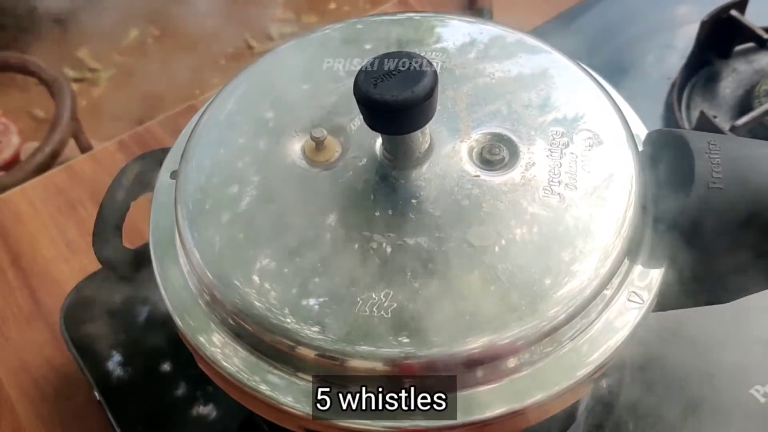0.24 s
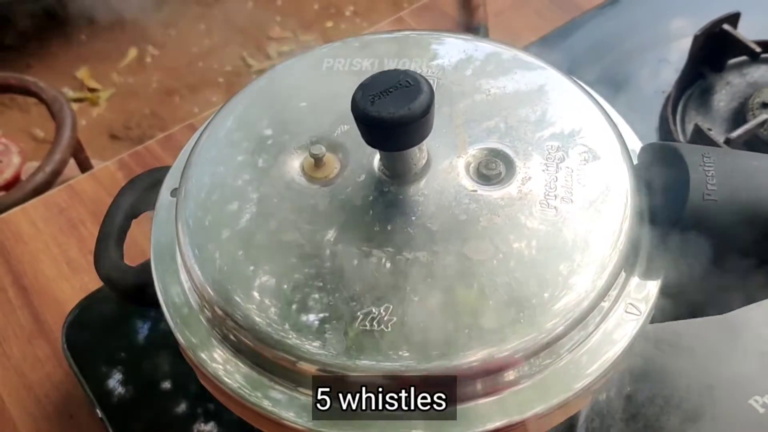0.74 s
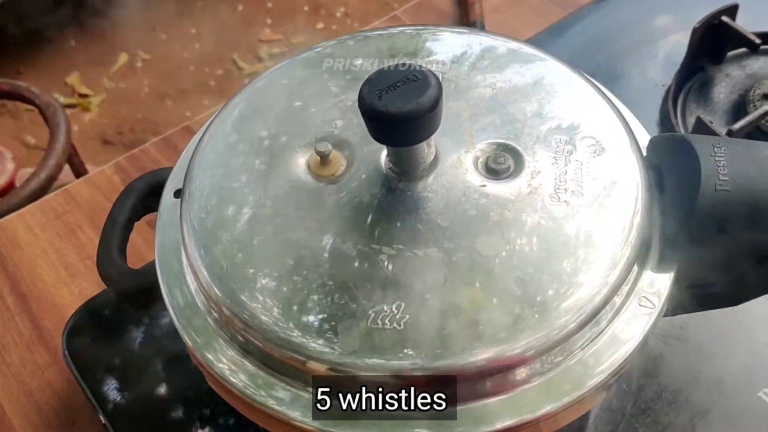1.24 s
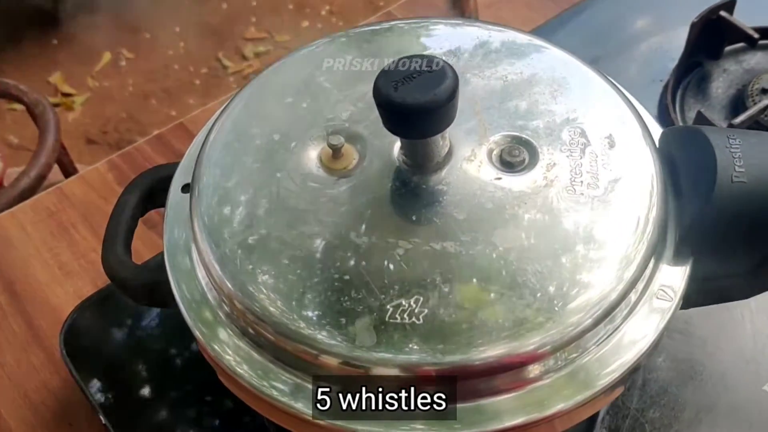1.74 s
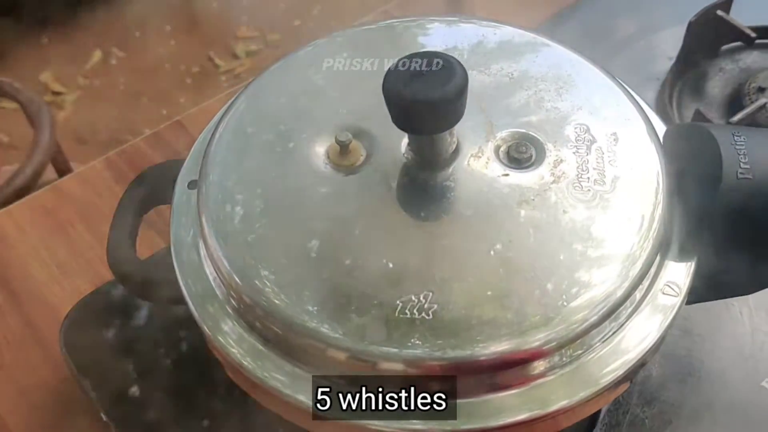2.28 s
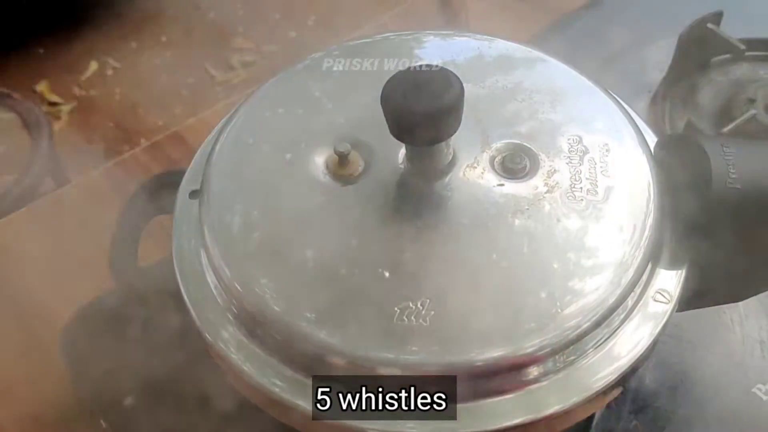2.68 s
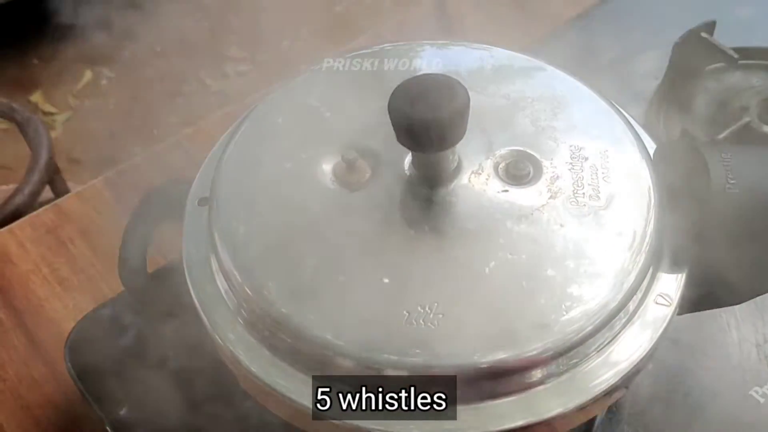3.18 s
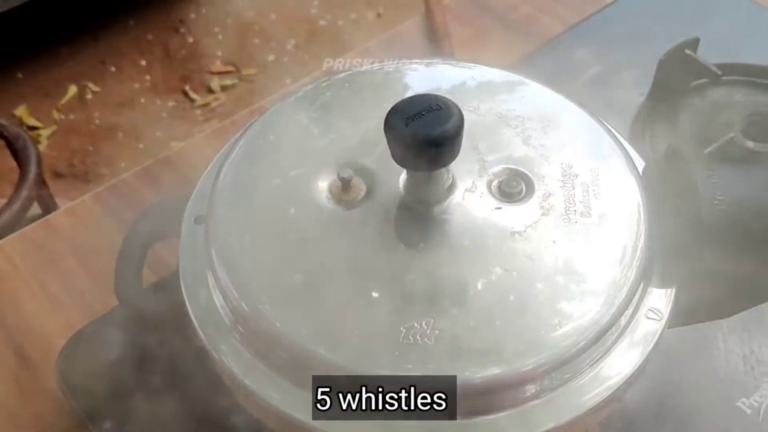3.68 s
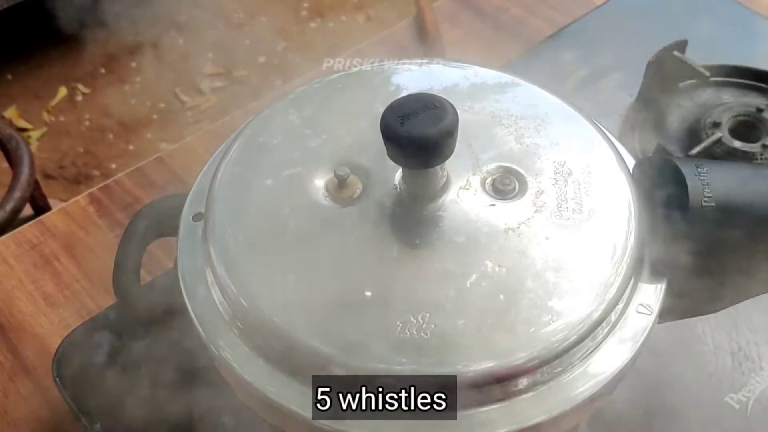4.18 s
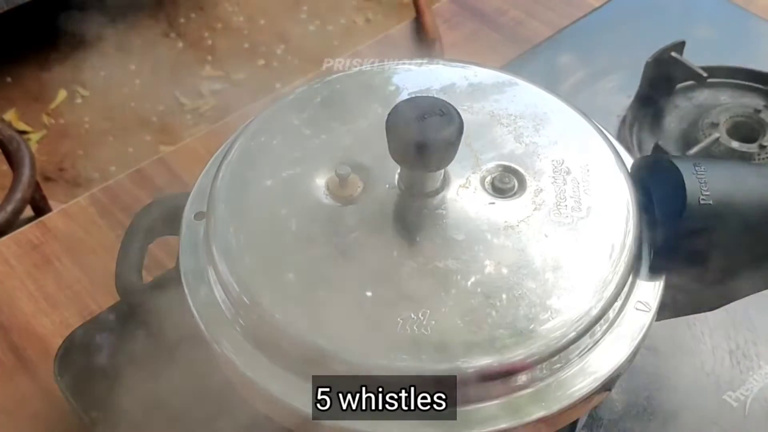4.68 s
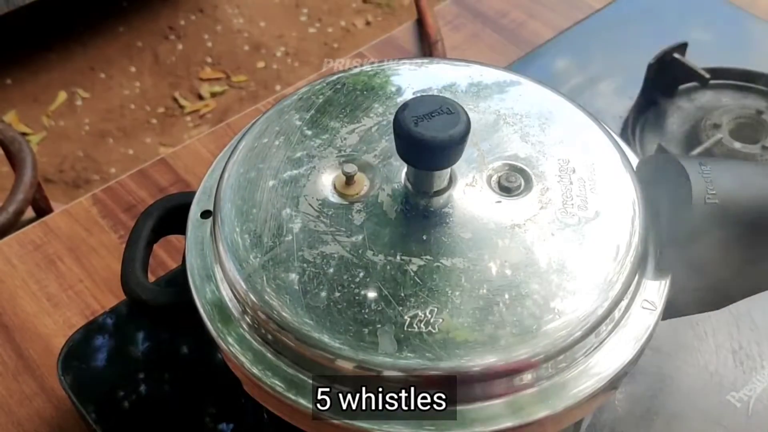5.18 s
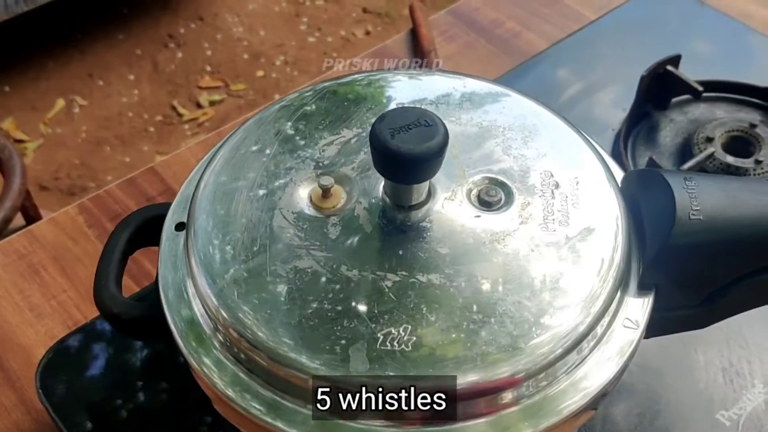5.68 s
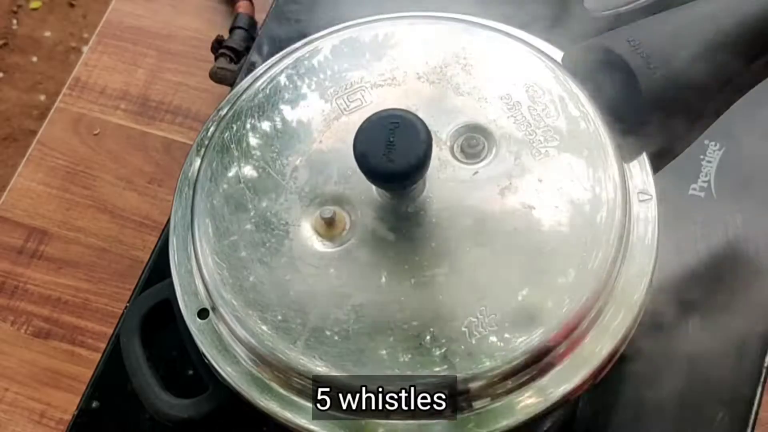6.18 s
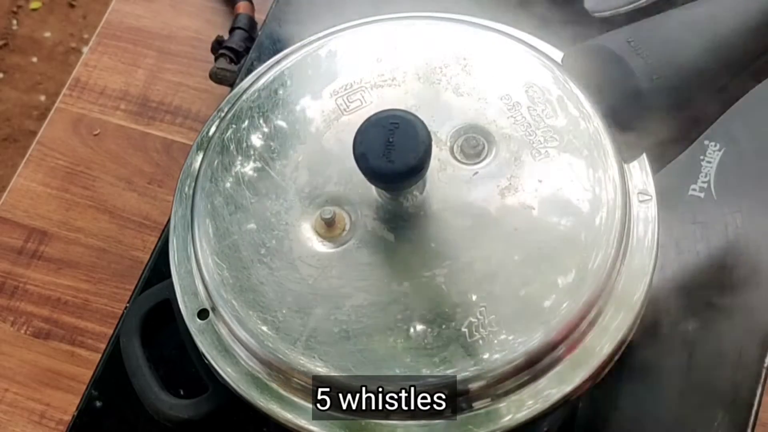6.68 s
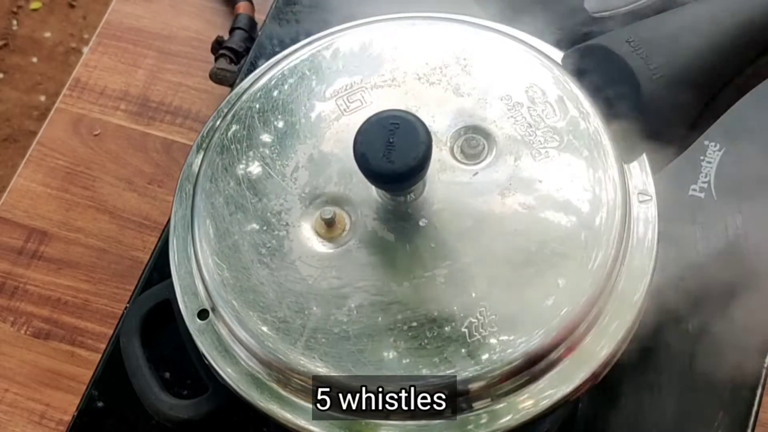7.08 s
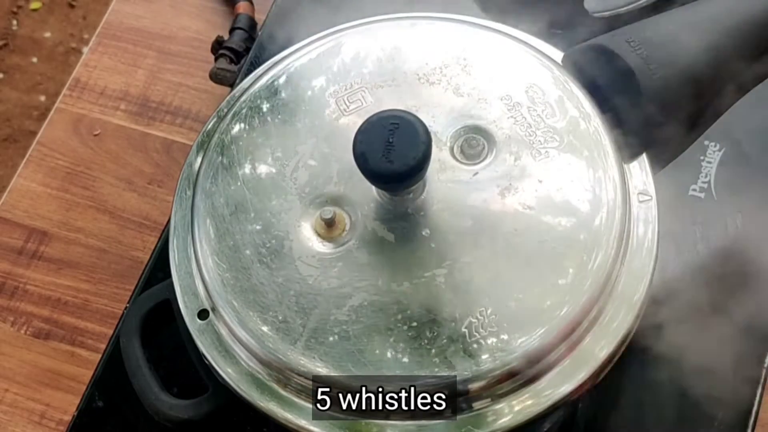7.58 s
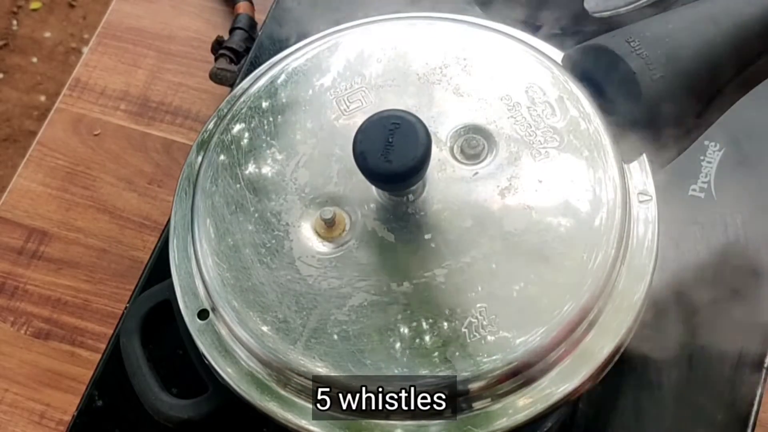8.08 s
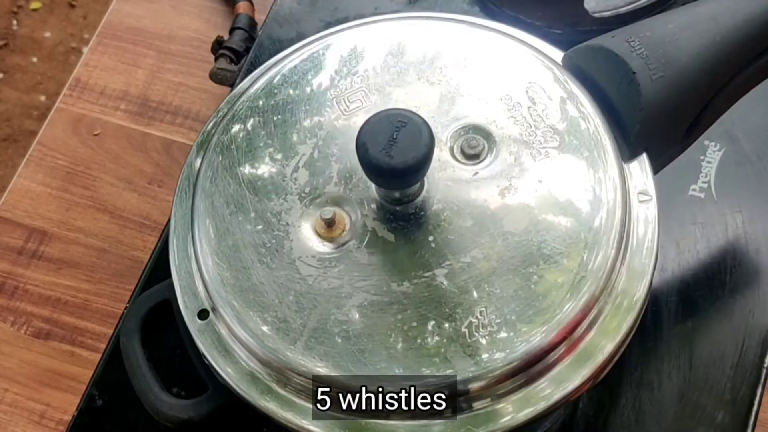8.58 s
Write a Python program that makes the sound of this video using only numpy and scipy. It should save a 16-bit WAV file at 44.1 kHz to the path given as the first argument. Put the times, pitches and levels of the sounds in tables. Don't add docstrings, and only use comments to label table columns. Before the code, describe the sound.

Close stereo microphone in a yard: a long, loud, bright steam blast, distorted with rough crackling spurts, stops suddenly. Quick bird whistles, short steam spits, a gurgle and two light metal taps follow over faint traffic air. The scene fades out and into a second steady steam hiss, slightly softer and cleaner, with wind rumble and an idling engine. It snaps shut, leaving a faint seep and a distant honk.

```python
import sys
import numpy as np
from scipy import signal
from scipy.io import wavfile
from scipy.ndimage import uniform_filter1d

SR = 44100
rng = np.random.default_rng(int(sys.argv[2]) if len(sys.argv) > 2 else 0)


def makeup_ratio(level_db):
    decades = np.asarray(level_db, float) / 20
    return 10 ** decades


def log_audio(samples):
    frames = np.atleast_2d(samples).T
    limited = np.clip(frames, -1, 1)
    pcm = np.round(limited * 32767).astype(np.int16)
    wavfile.write(sys.argv[1], SR, pcm)


N = 389844

# (frequency [Hz], level [dB per Hz])
YARD_COLOUR = [(12, -31), (20, 4), (170, -1.5), (319, -14.5), (1390, -17), (2620, -17), (2930, -20.5),
               (3460, -20), (4200, -22), (4950, -14), (6500, -19), (9370, -25), (12000, -25.5),
               (15000, -34)]
YARD_DB = -42
# (frequency [Hz], likeness [0-1])
YARD_SAME = [(30, 0.87), (500, 0.9), (1000, 0), (4000, 0.06)]
# (frequency [Hz], lead [radians])
LEAK_LEAD = [(700, 0.73), (2330, 6.2), (4570, 12), (9900, 20.7)]
# (frequency [Hz], level [dB])
HUM = (180, -57.5)

# (time [s], length [s], pitch [Hz], level [dB])
HELD_NOTES = [(4.799, .088, 2770, -45), (4.9, .025, 2370, -41), (4.926, .012, 2350, -30),
              (5.016, 0.029, 3630, -33), (5.06, .012, 2350, -40), (5.141, 0.038, 3580, -35),
              (5.235, 0.066, 1850, -40), (5.251, 0.024, 3680, -42), (5.295, 0.04, 1776, -35.5),
              (5.297, .025, 3520, -42.5), (5.344, 0.03, 3050, -41), (5.413, .035, 1750, -39),
              (5.414, .039, 5150, -43), (5.418, .02, 2420, -40), (5.418, .064, 3520, -45),
              (5.45, 0.028, 1840, -40), (5.465, 0.054, 2670, -44), (5.48, 0.027, 2240, -32.5),
              (5.48, 0.038, 3450, -39), (5.519, 0.025, 2610, -29.5), (5.562, 0.044, 3790, -35),
              (5.565, 0.038, 1867, -35), (5.695, 0.034, 2390, -32.5), (5.755, .022, 1900, -44),
              (5.795, 0.022, 2620, -40), (5.823, 0.0094, 2330, -31), (6.012, .022, 2580, -36),
              (6.122, .02, 2550, -41), (5.41, 0.057, 1800, -44), (5.72, 0.052, 1900, -48),
              (6.056, 0.02, 2280, -37)]
# (time [s], length [s], first pitch [Hz], last pitch [Hz], level [dB])
RISING_NOTES = [(4.933, 0.027, 2400, 2880, -28.5), (5.267, .022, 2350, 3800, -38),
                (5.331, 0.017, 1850, 2650, -34.5), (5.368, .009, 3180, 3870, -38),
                (5.632, 0.02, 2890, 4050, -41), (5.768, 0.023, 2250, 2640, -39),
                (5.938, 0.031, 1900, 3300, -40.5), (6.11, 0.036, 1940, 2550, -39)]
FALLING_NOTES = [(4.96, 0.031, 2900, 2700, -35), (4.99, .024, 2680, 2560, -28.5),
                 (5.01, .021, 2470, 2140, -29.5), (5.05, 0.011, 3150, 2400, -36),
                 (5.083, .02, 4253, 3620, -29), (5.1, .015, 3740, 3100, -39), (5.1, .017, 3000, 1520, -37),
                 (5.324, 0.027, 4200, 3150, -34.5), (5.378, 0.014, 3800, 3260, -32),
                 (5.54, 0.027, 2260, 1915, -31.5), (5.55, 0.014, 4250, 3800, -33),
                 (5.604, .015, 3798, 3120, -40), (5.659, .027, 3970, 3400, -36.5),
                 (5.686, 0.016, 3310, 2420, -35.5), (5.834, .033, 2200, 1410, -49),
                 (5.999, 0.018, 3300, 2570, -38), (6.04, .02, 3380, 2880, -41),
                 (6.092, 0.018, 2310, 1850, -44)]
ARCH, RISE_HALF, FALL_HALF = 1.012, 0.552, 0.61

# (time [s], level [dB], pitch [Hz])
HORN = [
    (8.49, -52, 349.8),
    (8.515, -36.5, 348),
    (8.558, -30.5, 347),
    (8.582, -34, 343.5),
    (8.766, -28, 342),
    (8.822, -45, 360),
    (8.84, -55, 346),
]
# (multiple of pitch, level [dB])
HORN_BELL = [(6, -17.5), (7, -11), (8, -1.5), (9, -3), (10, 0), (11, -13), (12, -21)]

# (time [s], level [dB])
WIND_LEVEL = [(6.42, -37), (6.8, -37.5), (7.19, -38), (7.4, -38.5), (7.45, -42), (8.3, -42.5), (8.42, -46),
              (8.5, -27.5), (8.84, -30)]
# (frequency [Hz], level [dB per Hz])
RUMBLE = [(8.8, -38), (15, -4), (48, 0.5), (180, -12), (297, -20.5), (347, -19.5), (454, -26.5),
          (551, -24.5), (595, -27.5), (1500, -32), (1950, -38), (3300, -120)]
# (frequency [Hz], likeness [0-1])
RUMBLE_SAME = [(40, 0.1), (150, 0.72), (500, 0.4)]
DEEP_DB, DEEP_FADE_DB_PER_S, DEEP_SWAY_DB = 4.5, 4, 1
# (frequency [Hz], level [dB])
ENGINE_IDLE = [(39, -39.5), (80, -50), (134, -49)]

# (time [s], peak level [dB], pitch factor)
KNOCKS = [
    (5.9345, -13.5, 1.0),
    (6.0805, -8.5, .69),
]
# (frequency [Hz], level [dB], t60 [s])
WEIGHT_MODES = [(2350, -12, .03), (3400, -2, .022), (4340, -11, .04), (4720, -9, .06), (7000, -18, .02)]
# (time [s], level [dB], frequency [Hz], t60 [s])
SHUDDERS = [
    (4.79, -41, 646, 0.27),
    (4.865, -38, 600, .25),
    (5.984, -45, 460, 0.19),
]

# (time [s], level [dB], fall [dB per s], gurgle against the puff [dB])
LEAK_1 = [
    (4.79, -35, 170, -3),
    (4.995, -34.5, 73, 1.5),
    (5.151, -34, 260, -1),
    (5.415, -48, 600, 3),
    (5.468, -32.5, 200, -0.5),
    (5.505, -31, 202, -4),
    (5.937, -43, 150, 1),
    (5.978, -42, 90, 4),
    (6.082, -37, 40, 3.5),
]
LEAK_2 = [
    (8.41, -41, 59, -8),
    (8.52, -46.5, 12, 4),
]
# (frequency [Hz], level [dB per Hz])
LEAK_LEFT = [(3000, -33), (4000, -16.5), (5000, -7), (7000, -12), (9500, -25), (15000, -31)]
LEAK_RIGHT = [(3000, -27), (4400, -9), (5500, -3), (6000, 5.5), (6600, -2), (7500, -6.5), (9500, -16.5),
              (15000, -27)]
LEAK_LATE = [(3000, -4), (4400, -18), (6000, -9), (9500, -12), (15000, -20)]
# (frequency [Hz], level [dB per Hz])
GURGLE = [(1200, -35), (2000, -7.5), (2800, -2.5), (3600, 2), (4400, -3), (5500, -27)]
# (frequency [Hz], likeness [0-1])
LEAK_SAME = [(1000, 0.66), (4000, 0.18), (9000, 0.18)]
PUFF_RISE_DB_PER_S, PUFF_HOLD_S, SEEP_DB = 6000, 0.028, -58

# (frequency [Hz], level [dB per Hz])
CRACKLE = [(25, 1), (70, 0), (250, 0.5), (1000, 0), (2400, -0.5), (3200, -9), (5000, -33)]
# (time [s], peak level [dB], time to lose 10 dB on either side [s])
OVERLOAD_LEFT = [(.24, -28.5, 2.3), (.693, -27, 0.1), (1.043, -26, .15), (1.25, -27, .1),
                 (1.492, -18.5, 0.05), (1.581, -19.5, 0.04), (1.756, -21.5, 0.09), (1.94, -21, .09),
                 (2.06, -28, 1.5), (2.165, -17.5, 0.05), (2.235, -21, .05), (2.62, -28, 0.72),
                 (2.95, -23.5, 0.26), (3.1, -28.5, 0.55), (3.275, -20.5, 0.06), (3.58, -27.5, 0.3),
                 (3.771, -16.5, 0.0452), (4.245, -21.5, 0.02), (4.385, -26.5, 0.2), (4.455, -21, 0.05),
                 (4.59, -27.5, 0.5), (4.7, -25.5, 0.14)]
OVERLOAD_RIGHT = [(.3, -29, 1), (.95, -28.5, 0.86), (1.72, -30, 0.33), (2.05, -27, 0.13), (2.22, -32, .15),
                  (2.58, -29, 0.29), (2.79, -29.5, 0.12), (2.928, -26, .07), (3.1, -30, 0.5),
                  (3.45, -27.5, 0.46), (3.74, -29.5, 0.22), (3.87, -27.5, 0.19), (4.1, -26, 0.48),
                  (4.39, -28, .3), (4.68, -29, 0.39)]
LULL_DB = -36.5
# (time [s], peak level [dB])
POPS = [(0.146, -16.5), (0.211, -17), (0.683, -20), (0.779, -25), (0.977, -23), (1.258, -20), (1.433, -23),
        (1.458, -20), (1.491, -12), (1.572, -19), (1.648, -18), (1.753, -15), (1.849, -19), (1.901, -19),
        (2.001, -21), (2.108, -22), (2.153, -13), (2.225, -16), (2.338, -22), (2.39, -22.5), (2.465, -25),
        (2.519, -21), (2.623, -17), (2.684, -27), (2.723, -19), (2.768, -17), (2.839, -18), (2.915, -15),
        (2.968, -16), (3.025, -21), (3.085, -21), (3.179, -24), (3.244, -14), (3.292, -17), (3.362, -25),
        (3.385, -24), (3.502, -22), (3.734, -19), (3.766, -13), (3.952, -25), (3.978, -23), (4.083, -20),
        (4.232, -16), (4.295, -18), (4.362, -24), (4.386, -18), (4.584, -19), (4.693, -18)]
POP_S, POP_LIFT_DB = 0.0045, -5

# (time the weight drops [s], level [dB], last gasp [dB])
JET_1 = (4.772, -15, 1.7)
JET_2 = (8.397, -19.5, 5.1)
# (frequency [Hz], level [dB per Hz])
JET_1_LEFT = [(1600, -22), (2840, -3.4), (3230, -1), (4130, -2.2), (5470, .8), (6030, -1.9), (6500, 1.6),
              (7840, -.5), (8400, 1.4), (10680, -2.8), (12400, -.8), (15300, -2.9)]
JET_1_RIGHT = [(1600, -25), (2840, -7.4), (3790, 3.7), (4180, -1.5), (5640, 9.9), (6200, 5.1), (6850, 6.1),
               (8180, -1.1), (10030, 1.6), (10850, 4.9), (13440, 1.9), (15300, -2.6)]
JET_2_LEFT = [(300, -30), (520, -21), (1340, -12), (3830, 2.8), (4820, -4), (5770, -2.8), (6800, -4.6),
              (7880, .4), (9040, -1.9), (11330, 5), (12360, -.2), (15300, .2)]
JET_2_RIGHT = [(300, -32), (520, -24), (950, -19.5), (1770, -8.4), (3190, -2.6), (4220, -3.5), (5810, 2.2),
               (9130, -1.8), (13520, 2.8), (14040, -3.2), (14690, 2.8), (15300, .8)]
# (frequency [Hz], likeness [0-1])
JET_1_SAME = [(2840, .07), (3570, .34), (3900, .4), (4080, .97), (4250, .97), (4500, .7), (5040, .8),
              (8900, .06), (9600, .45), (10160, .2), (10940, .45), (14300, .4), (15100, .1)]
JET_2_SAME = [(520, 0.24), (730, 0.24), (1890, 0.88), (3140, 0.5), (4090, 0.66), (4950, 0.48),
              (6070, 0.067), (9090, 0.035), (12790, 0.59), (14170, 0.16), (15290, 0.32)]
# (frequency [Hz], lead [radians])
JET_1_LEAD = [(2580, .1), (3530, -.8), (4150, -3.14), (5250, -8.2), (6550, -12.6), (7920, -13),
              (9470, -10.1), (10400, -10.5), (12200, -9.1), (14200, -7.7), (15600, -7)]
JET_2_LEAD = [(0, 13), (340, -0.5), (1550, -0.6), (4650, 0.1), (5000, -1.5), (5860, -1.5), (7490, 1.5),
              (8180, 2), (9650, 4.5), (10300, 6), (10900, 13), (11400, 13), (12800, 14), (16300, 14)]
# (time [s], strength [dB])
FIZZ_1 = [(0.0, -28), (0.01, -29.5), (1.08, -23.5), (1.51, -30.5), (1.62, -25.5), (1.93, -28.5),
          (2.06, -26), (2.51, -29), (2.62, -27), (2.86, -28.5), (3.05, -23.5), (3.27, -27), (3.47, -25),
          (3.83, -27), (4.12, -23), (4.16, -25), (4.64, -24), (4.77, -29)]
FIZZ_2 = [(6.45, -25), (6.564, -24.5), (8.29, -24), (8.372, -27), (8.4, -32)]
FIZZ_FROM_HZ, FIZZ_FULL_HZ = 9000, 12000
GASP_S, SURGE_DB = 0.13, 0.5
SHUT_DB_PER_S, AFTER_DB, AFTER_DB_PER_S = 1100, -8.5, 260
# (frequency [Hz], width [Hz], ring [dB])
PORT_RING = (4930, 338, 17.7)

# (time [s], gain [0-1])
JOINT = [
    (6.115, 0.61),
    (6.172, .001),
    (6.205, .001),
    (6.236, 0.01),
    (6.25, 0.17),
    (6.41, 1.0),
]
JOINT_S, EDGE_HZ = 6.19, 15520


def evened(x):
    return x / np.sqrt(np.mean(x ** 2) + 1e-20)


def read(points, hz):
    f, value = np.transpose(points)
    return np.interp(np.log(hz + 1), np.log(f + 1), value)


def times(first, last):
    return np.arange(round(first * SR), min(round(last * SR), N)) / SR


def level(rows, t, column=1):
    rows = np.array(rows)
    return np.interp(t, rows[:, 0], rows[:, column])


def add(mix, s, sound):
    part = mix[..., round(s * SR):][..., :sound.shape[-1]]
    part += sound[..., :part.shape[-1]]


def drift(shape, size):
    return evened(uniform_filter1d(uniform_filter1d(rng.standard_normal(shape), size), size))


def bandpass(low_hz, high_hz):
    return signal.butter(2, [low_hz, high_hz], "bandpass", fs=SR, output="sos")


def hiss(t, left, right, same, lead=((1, 0),), port=1, patchy_db=1.0, sway_s=0, wander_db=0,
         fizz=((0, 0),), order=9):
    size = 2 ** order
    frames, hz = 4 * len(t) // size + 5, np.fft.rfftfreq(size, 1 / SR)
    a, b, c, d, patches = rng.standard_normal((frames, len(hz), 5)).T
    patches = evened(uniform_filter1d(uniform_filter1d(patches, size=7, axis=0), size=24, axis=1))
    slow = evened(uniform_filter1d(drift(patches.shape, size=120), size=10, axis=0))

    sway = 2 * np.pi * hz[:, None] * sway_s * drift(frames, size=150)
    phase = read(lead, hz)[:, None] + sway
    like = np.clip(read(same, hz), 0, 1)[:, None]
    shared, private = a + 1j * b, c + 1j * d
    z = np.array([shared * np.exp(1j * phase), like * shared + np.sqrt(1 - like ** 2) * private])

    ring_hz, width_hz, ring_db = PORT_RING
    ring = port * ring_db * np.exp(-.5 * ((hz - ring_hz) / width_hz) ** 2)
    colour_db = np.array([read(left, hz) + ring, read(right, hz)])[..., None]
    z *= makeup_ratio(colour_db + patchy_db * patches + wander_db * slow * hz[:, None] / hz[-1])
    turn_db = level(fizz, t[0] + np.arange(frames) * size / 4 / SR)
    top = np.interp(hz, [FIZZ_FROM_HZ, FIZZ_FULL_HZ], [0, 1])[:, None]
    z *= makeup_ratio(top * (turn_db - turn_db.mean()))
    sound = signal.istft(z, nperseg=size, noverlap=size - size // 4)[1]
    return evened(sound[:, :len(t)])


def echoes(x, t60, wet_db):
    t = times(0, .5)
    signs = rng.choice([-1., 1.], (2, len(t)))
    sparse = rng.random((2, len(t))) < .12
    taps = signs * sparse * makeup_ratio(-60 * t / t60) * (t > .004)
    taps *= makeup_ratio(wet_db) / np.linalg.norm(taps, axis=1)[:, None]
    add(taps[0], 0, np.ones(1))
    add(taps[1], .00035, makeup_ratio(3.5) * np.ones(1))
    return signal.oaconvolve(x[None], taps, axes=1)[:, :N]


def yard():
    air = hiss(times(0, N / SR), YARD_COLOUR, YARD_COLOUR, YARD_SAME, port=0.38, patchy_db=3.0, order=11)
    hum_hz, hum_db = HUM
    hum = makeup_ratio(hum_db + 6.3 * drift(N, size=1500)) * np.sin(2 * np.pi * hum_hz * np.arange(N) / SR)
    return makeup_ratio(YARD_DB) * air + hum


def wind():
    t = times(JOINT_S, N / SR)
    lumps = 2.2 * drift(len(t), size=1300)
    gusts = hiss(t, RUMBLE, RUMBLE, RUMBLE_SAME, port=0, patchy_db=1.9, order=12)
    deep = signal.sosfiltfilt(signal.butter(3, 55, fs=SR, output="sos"), gusts)
    deep_db = DEEP_DB - DEEP_FADE_DB_PER_S * (t - JOINT_S) + DEEP_SWAY_DB * drift(len(t), size=5000)
    gusts = evened(gusts - deep) + makeup_ratio(deep_db) * evened(deep)
    drone = np.zeros(len(t))
    for hz, db in ENGINE_IDLE:
        drone += makeup_ratio(db + 5.6 * drift(len(t), size=2500)) * np.sin(2 * np.pi * hz * t)
    return makeup_ratio(np.array([[1.8], [-1.6]])) * (makeup_ratio(level(WIND_LEVEL, t) + lumps) * gusts + drone)


def horn():
    t = times(HORN[0][0], N / SR)
    hz = level(HORN, t, column=2) * (1 + .004 * drift(len(t), size=120))
    turns = 2 * np.pi * np.cumsum(hz) / SR
    tones = np.zeros(len(t))
    for k, db in HORN_BELL:
        flutter = 7.0 * np.tanh(drift(len(t), size=130))
        tones += makeup_ratio(db + flutter) * np.sin(int(k) * turns + k)
    rasp = signal.sosfilt(bandpass(2500, 3700), rng.standard_normal(len(t)))
    return makeup_ratio(level(HORN, t)) * (evened(tones) + makeup_ratio(-14) * evened(rasp))


def bird_note(length, first_hz, middle_hz, last_hz, db):
    u = np.linspace(-.1, 1.1, round(1.2 * length * SR))
    hz = np.polyval(np.polyfit([0, .5, 1], [first_hz, middle_hz, last_hz], deg=2), u)
    hz = hz * (1 + .009 * drift(len(u), size=110))
    broken = 4.8 * np.tanh(drift(len(u), size=170))
    swell = makeup_ratio(db + 4.2 + broken) * signal.windows.tukey(len(u), .3)
    turns = 2 * np.pi * np.cumsum(hz) / SR
    return swell * (np.sin(turns) + 0.074 * np.sin(2 * turns))


def birdsong():
    birds = np.zeros(N)
    glides = [(s, length, hz, ARCH * hz, hz, db) for s, length, hz, db in HELD_NOTES]
    for rows, half in (RISING_NOTES, RISE_HALF), (FALLING_NOTES, FALL_HALF):
        glides += [(s, length, a, a + half * (b - a), b, db) for s, length, a, b, db in rows]
    for s, length, *glide in glides:
        add(birds, s - .1 * length, bird_note(length, *glide))
    return birds


def shudder(db, hz, t60):
    t = times(0, .3)
    rattle = signal.sosfilt(bandpass(hz / 1.5, hz * 1.3), rng.standard_normal(len(t)))
    return makeup_ratio(db - 60 * t / t60) * evened(rattle)


def knock(db, factor):
    t = times(0, .15)
    modes = np.zeros(len(t))
    for hz, mode_db, t60 in WEIGHT_MODES:
        modes += makeup_ratio(mode_db - 60 * t / t60) * np.sin(2 * np.pi * hz * factor * t)
    tick = np.diff(rng.standard_normal(len(t) + 1)) * makeup_ratio(-24 - 60 * t / 0.016)
    return makeup_ratio(db) * (modes * np.minimum(t / .0012, 1) + tick) / 2


def leak(first, last, rows, left, right, lift_db):
    t = times(first, last)
    spit = 2.0 * drift(len(t), size=150)
    puffs = hiss(t, left, right, LEAK_SAME, LEAK_LEAD, patchy_db=2.0, order=8)
    gurgle = hiss(t, GURGLE, GURGLE, LEAK_SAME, LEAK_LEAD, port=0, patchy_db=4.0, order=8)
    s, db, fall, wet_db = np.transpose(rows)[..., None]
    rise_db = PUFF_RISE_DB_PER_S * np.maximum(s - t, 0)
    each_db = db - rise_db - fall * np.maximum(t - s - PUFF_HOLD_S, 0)
    dry_gain = makeup_ratio(np.maximum(each_db.max(axis=0), SEEP_DB))
    wet_gain = makeup_ratio(np.maximum((each_db + wet_db).max(axis=0), SEEP_DB))
    return first, makeup_ratio(lift_db + spit) * (dry_gain * puffs + wet_gain * gurgle)


def swells(rows, t):
    spurts_db = [db - 10 * abs(t - s) / spread for s, db, spread in rows]
    return np.max(spurts_db + [LULL_DB + 0 * t], axis=0)


def overload():
    t = times(0, 4.79)
    spurts = 3.12 * drift((2, len(t)), size=120) + 0.95 * drift((2, len(t)), size=500)
    levels_db = np.array([swells(OVERLOAD_LEFT, t), swells(OVERLOAD_RIGHT, t)])
    pops = np.zeros(len(t))
    for s, db in POPS:
        burst = np.exp(-abs(times(0, .05) - .022) / POP_S)
        add(pops, s - .02, makeup_ratio(db + POP_LIFT_DB) * burst)
    gain = makeup_ratio(levels_db + 1.5 + spurts) + pops * makeup_ratio(np.array([[0], [-9]]))
    return gain * hiss(t, CRACKLE, CRACKLE, [(1, 0.096)], port=0, patchy_db=0.9)


def jet(t, valve, left, right, same, lead, fizz, flutter_db, lift_db):
    drop_s, jet_db, gasp_db = valve
    since = np.maximum(t - drop_s, 0)
    shut_db = np.maximum(-SHUT_DB_PER_S * since, AFTER_DB - AFTER_DB_PER_S * since)
    flutter = flutter_db * drift(len(t), size=900) + SURGE_DB * drift(len(t), size=9000)
    steady = [(hz, like ** 0.97) for hz, like in same]
    steam = hiss(t, left, right, steady, lead, patchy_db=.8, sway_s=7e-6, wander_db=2, fizz=fizz)
    gasp = makeup_ratio(gasp_db * np.clip(1 - (drop_s - t) / GASP_S, 0, 1)) - 1
    steam = steam + gasp * signal.sosfiltfilt(bandpass(4400, 7000), steam)
    return makeup_ratio(jet_db + shut_db + lift_db + flutter) * steam


def scene():
    mix, street, valve = np.zeros((2, N)), np.zeros(N), np.zeros(N)
    add(street, HORN[0][0], horn())
    far = yard() + echoes(birdsong(), .32, -5) + echoes(street, .2, -4)
    add(mix, JOINT_S, wind())

    for s, *rattle in SHUDDERS:
        add(valve, s, shudder(*rattle))
    for s, db, factor in KNOCKS:
        add(valve, s, knock(db, factor))
    add(mix, *leak(4.78, JOINT_S, LEAK_1, LEAK_LEFT, LEAK_RIGHT, lift_db=4.0))
    add(mix, *leak(8.4, N / SR, LEAK_2, LEAK_LATE, LEAK_LATE, lift_db=5.0))

    add(mix, 0, overload())
    add(mix, 0, jet(times(0, 4.95), JET_1, JET_1_LEFT, JET_1_RIGHT, JET_1_SAME, JET_1_LEAD, FIZZ_1,
                    flutter_db=0.5, lift_db=6.0))
    add(mix, JOINT_S, jet(times(JOINT_S, 8.6), JET_2, JET_2_LEFT, JET_2_RIGHT, JET_2_SAME, JET_2_LEAD, FIZZ_2,
                          flutter_db=0.54, lift_db=5.0))
    return mix + far + echoes(valve, .12, -5.0)


def low_pass(x):
    return signal.sosfilt(signal.butter(12, 16710, fs=SR, output="sos"), x)


def record(dry):
    faded = np.clip(dry, -.9, .9) * level(JOINT, np.arange(N) / SR)
    edge = signal.firwin(1023, EDGE_HZ, window=("kaiser", 9), fs=SR)
    return low_pass(signal.oaconvolve(faded, edge[None], "same"))


dry = scene()
out = record(dry)
log_audio(out)
```